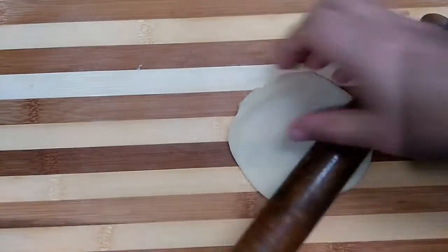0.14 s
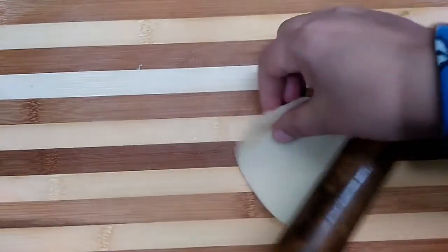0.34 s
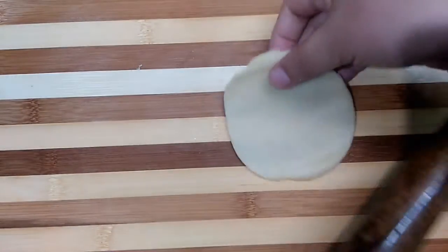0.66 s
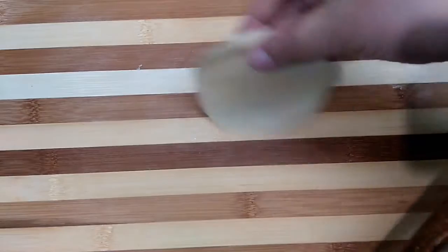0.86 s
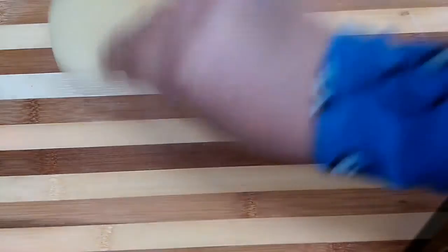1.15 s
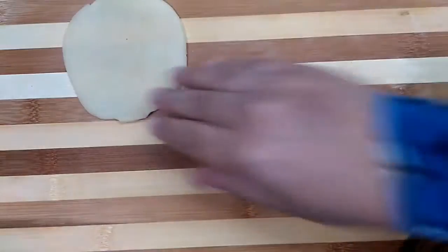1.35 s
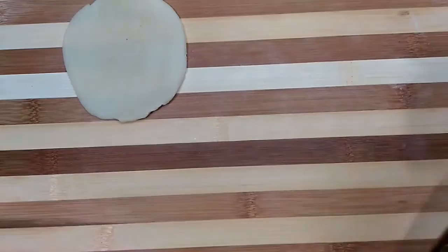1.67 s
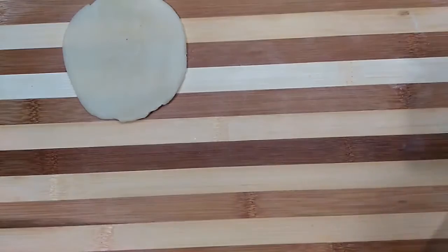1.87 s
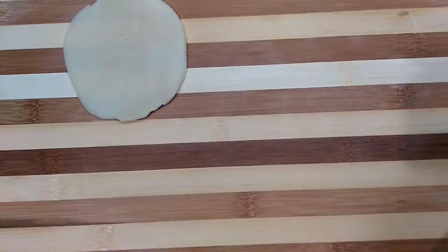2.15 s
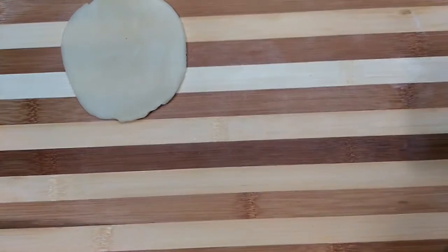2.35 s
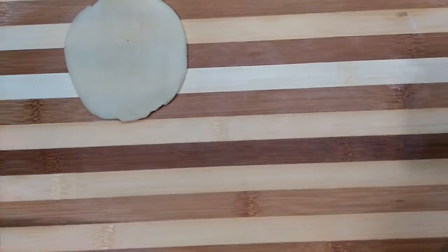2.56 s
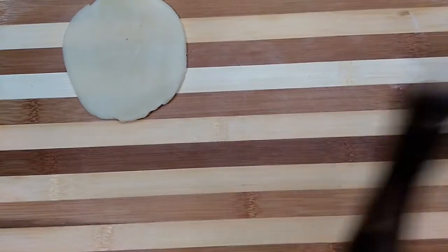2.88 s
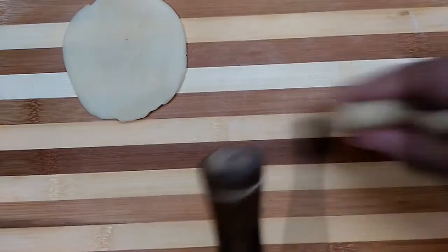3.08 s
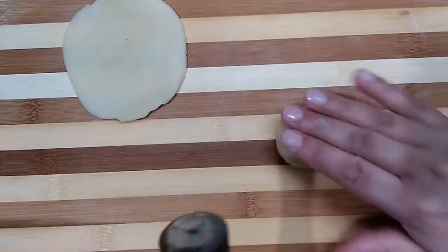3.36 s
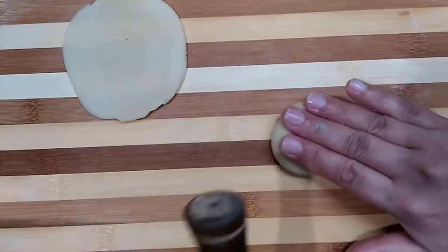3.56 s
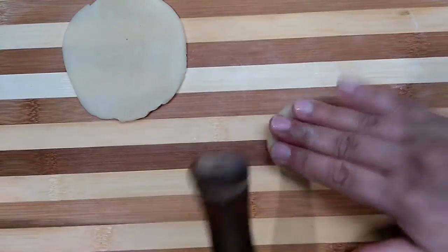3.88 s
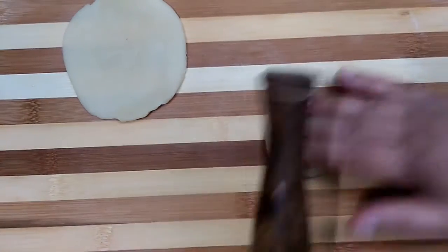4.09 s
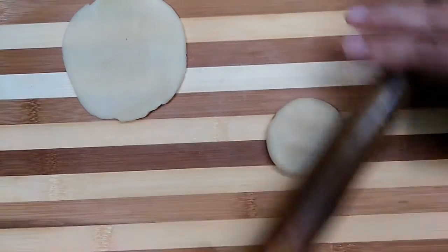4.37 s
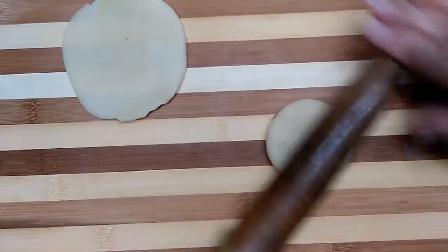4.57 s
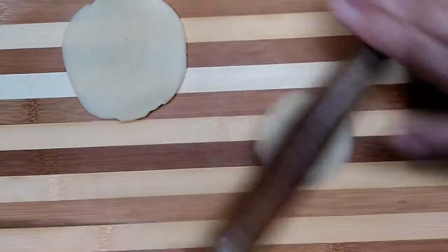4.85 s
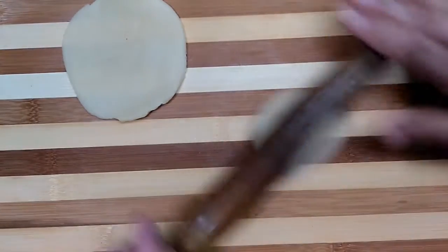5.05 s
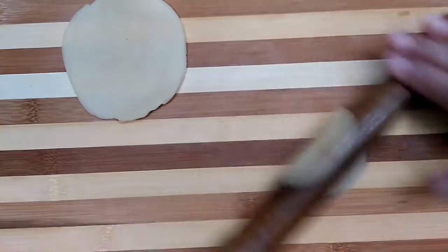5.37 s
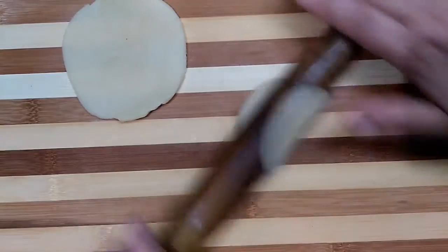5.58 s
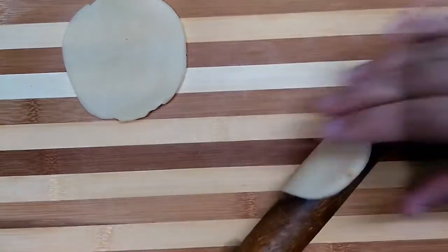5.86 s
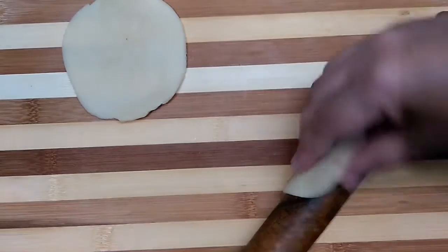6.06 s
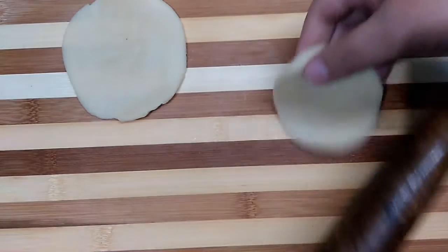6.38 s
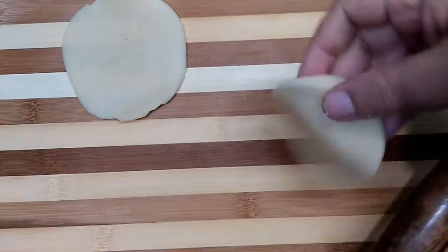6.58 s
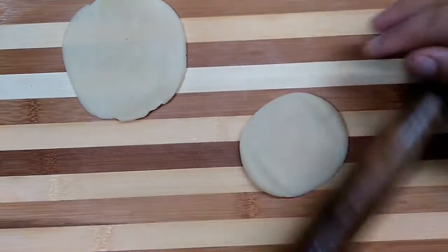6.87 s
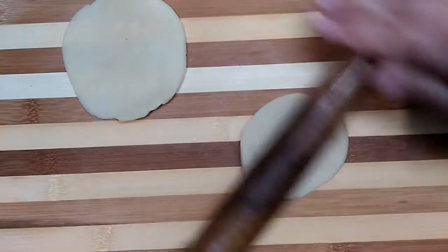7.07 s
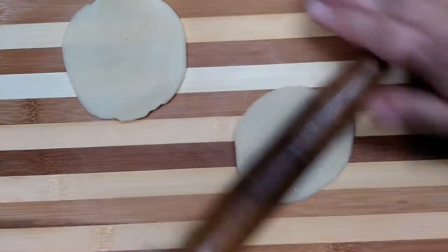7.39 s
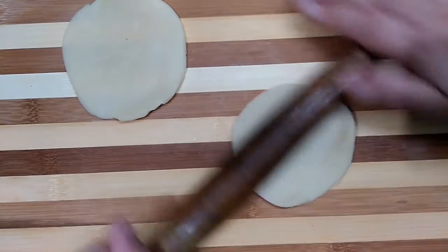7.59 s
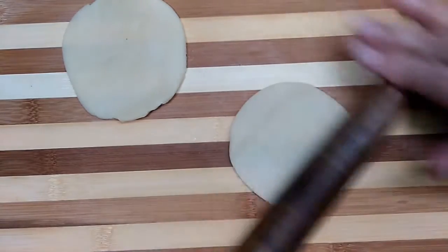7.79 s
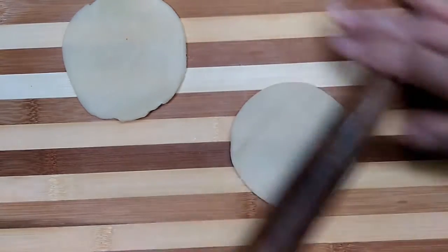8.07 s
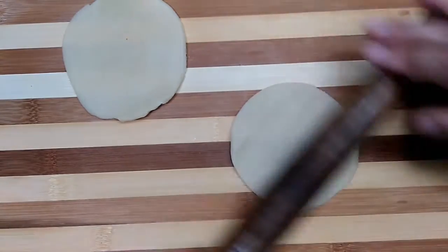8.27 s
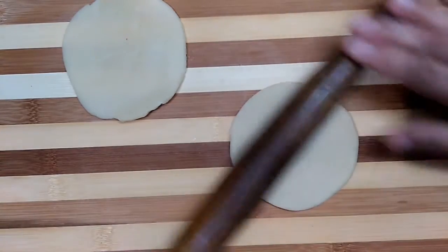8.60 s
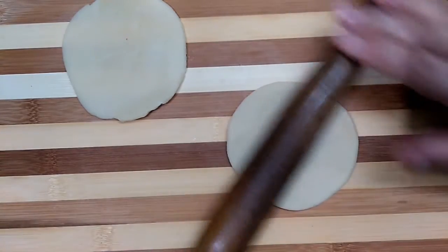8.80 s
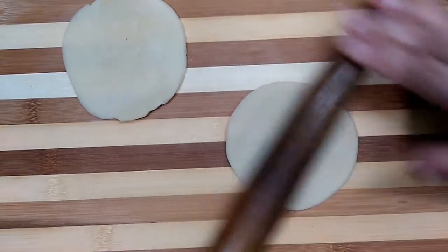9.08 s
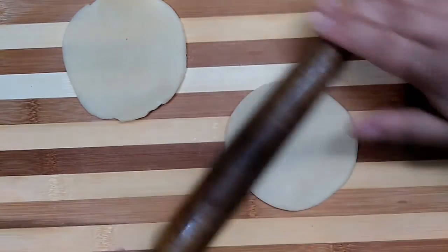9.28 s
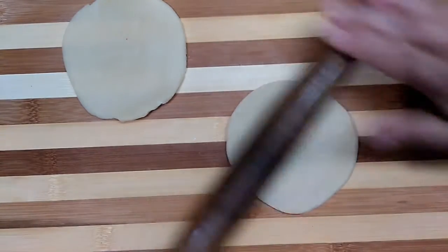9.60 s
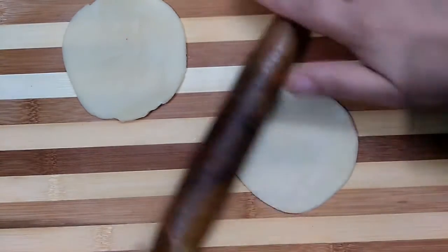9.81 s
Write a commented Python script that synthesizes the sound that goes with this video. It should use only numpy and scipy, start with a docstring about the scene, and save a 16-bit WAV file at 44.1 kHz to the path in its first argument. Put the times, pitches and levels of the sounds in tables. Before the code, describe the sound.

In a quiet humming kitchen, dough is slapped onto wood and rolled in rhythmic swishes with sharp knocks and dull table booms.

```python
"""A quiet kitchen: hands roll small dough rounds with a wooden pin on a bamboo board.
Strokes are shaped noise, a flour hiss over board rumble; cloth rustles and a palm squeaks in narrower noise bands.
Wooden knocks and worktop booms are sums of dying modes; dough slaps are short noise bursts.
Motor and mains hum beat about twice a second under noisy room air.
The left microphone faces the board and hears the blows brighter."""
import sys
import numpy as np
from scipy import signal
from scipy.fft import rfft, irfft, next_fast_len
from scipy.io import wavfile

SR = 44100
rng = np.random.default_rng(int(sys.argv[2]) if len(sys.argv) > 2 else 0)


def master(y):
    """Save y as 16-bit WAV."""
    cut = np.clip(np.atleast_2d(y).T, -1, 1)
    pcm = np.round(cut * 32767)  # scale
    wavfile.write(sys.argv[1], SR, pcm.astype(np.int16))


N = 438337
TIME = np.arange(N) / SR

# modes of pin and board: pitch_hz [Hz], level_db [dB], t60_s [s]
WOOD_MODES = [(334, -6, 0.023), (395, 1, 0.031), (497, -0.5, 0.027), (600, 0, 0.03), (702, 0.5, .022),
              (814, 1.5, 0.021), (930, 3.5, 0.017), (1069, 1, 0.024), (1152, 2.5, 0.03),
              (1352, -0.5, 0.029), (1715, -9, 0.038), (1865, -12, 0.036)]


def amp(db):
    """Turn dB into gain."""
    return 10 ** (np.asarray(db) / 20)


def rms_one(x):
    """Scale to rms 1."""
    return x / np.sqrt(np.mean(x ** 2) + 1e-20)


def at_hz(points, hz):
    """Read a table of (Hz, value) on a log-frequency axis."""
    table_hz, values = np.array(points)[:, 0], np.array(points)[:, 1]
    return np.interp(np.log(hz + 1), np.log(table_hz), values)


def colour(x, spectrum):
    """Filter noise to a spectrum in dB per Hz, at rms 1."""
    size = next_fast_len(N)
    hz = np.arange(size // 2 + 1) * SR / size
    shaped = rfft(x, size) * amp(at_hz(spectrum, hz))
    return rms_one(irfft(shaped, size)[..., :N])


def resonate(x, hz, width_hz):
    """Pass sound through a two-pole resonance whose gain is 1 at its top."""
    r = np.exp(-np.pi * width_hz / SR)
    feed = (1 - r * r) / 2 * np.array([1, 0, -1])
    feedback = [1, -2 * r * np.cos(2 * np.pi * hz / SR), r * r]
    return signal.lfilter(feed, feedback, x)


def ring(modes, t, extra_db):
    """Sum the dying sines of struck modes, each with its own extra level."""
    hz, level_db, t60_s = np.transpose(modes)[:, :, None]
    decay_db = level_db + np.reshape(extra_db, (-1, 1)) - 60 * t / t60_s
    return np.sum(amp(decay_db) * np.sin(2 * np.pi * hz * t), axis=0)


def grains(per_s, spread_db, smooth):
    """Scatter random clicks of uneven size over a share of smooth noise, independent in each channel."""
    sizes = amp(spread_db * np.minimum(rng.exponential(1, (2, N)), 5))
    clicks = sizes * rng.choice([-1, 1], (2, N)) * (rng.random((2, N)) < per_s / SR)
    return rms_one(clicks) + smooth * rng.standard_normal((2, N))


def drift(per_s):
    """Wander slowly at random, with rms 1: low-passed noise after a second of settling."""
    lowpass = signal.butter(2, per_s, fs=SR, output="sos")
    return rms_one(signal.sosfilt(lowpass, rng.standard_normal(N + SR))[SR:])


def swells(rows):
    """Shape the gain of gestures: each a rounded rise, an optional hold and a rounded fall."""
    power = 2.0   # above 1 the swells are more pointed
    out = np.zeros(N)
    for top_s, level_db, rise_s, fall_s, *hold in rows:
        hold_s = sum(hold)
        near = slice(max(int((top_s - rise_s) * SR), 0), int((top_s + hold_s + fall_s) * SR))
        t = TIME[near] - top_s
        rise, fall = 1 + t / rise_s, 1 - (t - hold_s) / fall_s
        open_share = np.clip(np.minimum(rise, fall), 0, 1)
        out[near] += amp(level_db) * np.sin(np.pi / 2 * open_share) ** power
    return out


def add(out, sound, start_s):
    """Mix a sound in at its start time."""
    at = round(start_s * SR)
    out[..., at:at + sound.shape[-1]] += sound[..., :N - at]


def strokes():
    """The pin crushes flour, turns in the hands (each grip hollow waxes and wanes) and drives the board."""
    # pin strokes swelling with pin speed: fastest_s [s], level_db [dB], rise_s [s], fall_s [s]
    stroke_rows = [(.038, -55, 0.067, 0.14), (4.61, -55.5, 0.096, 0.11), (4.71, -52, 0.084, 0.075),
                   (4.79, -53, 0.039, 0.28), (5.028, -50, 0.084, 0.092), (5.204, -53, 0.18, 0.15),
                   (5.404, -49.5, 0.14, 0.1), (5.6, -50, 0.19, 0.085), (5.8, -49.5, 0.2, 0.12),
                   (7.052, -53, 0.041, 0.066), (7.15, -52, 0.069, 0.11), (7.33, -45.5, 0.097, 0.048),
                   (7.456, -49.5, 0.12, .09), (7.608, -51.5, 0.11, 0.13), (7.79, -47, 0.098, 0.14),
                   (7.966, -50, 0.092, 0.1), (8.12, -49, 0.099, 0.19), (8.52, -50.5, 0.13, 0.06),
                   (8.66, -51, 0.12, 0.094), (8.81, -49.5, 0.064, 0.11), (8.97, -51.5, 0.093, 0.13),
                   (9.15, -48.5, 0.092, 0.14), (9.32, -49.5, 0.092, 0.12), (9.5, -48, 0.09, 0.13),
                   (9.7, -47.5, 0.14, .18), (9.94, -56, 0.13, 0.057)]
    # flour hiss spectrum: pitch_hz [Hz], level_db [dB per Hz]
    flour_spectrum = [(600, -24), (1500, -1.5), (3000, -24), (5000, -1), (7000, 4), (9000, -0.5),
                      (12000, -1.5), (16000, 1.5)]
    # hollows of the left hand round the handle: pitch_hz [Hz], width_hz [Hz], level_db [dB]
    grip_hollows = [(1875, 180, -13.5), (2990, 1500, -3.5), (3195, 250, -7.5), (4740, 480, -6),
                    (5244, 360, -1.5), (5850, 300, -6.5), (6570, 900, 1), (7110, 620, -5.5),
                    (8340, 4400, -3.5)]
    # board resonances under the pin: pitch_hz [Hz], width_hz [Hz], level_db [dB]
    rolling_modes = [(61, 47, -34), (790, 77, 8), (960, 84, 10.5), (1340, 48, -3), (1830, 87, -12.5)]
    rumble_db = -12   # middle level of the board rumble, before left-right balance

    grip = 0
    for hz, width_hz, level_db in grip_hollows:
        rub = grains(9000.0, 4.5, 4.0)[0]
        rub = resonate(resonate(rub, hz, width_hz), hz, width_hz)
        grip = grip + rms_one(rub) * amp(level_db + 3.5 * drift(11.0))
    flour = colour(grains(8300.0, 4.0, 9.4), flour_spectrum)
    hiss = flour * amp([[-8], [-9]]) + rms_one(grip) * amp([[3], [-18]])

    drive = grains(2500.0, 4.0, .8)
    drive = 0.43 * drive[0] + 1.13 * drive   # partly alike on both sides
    rumble = rms_one(sum(amp(level_db) * resonate(drive, hz, width_hz)
                         for hz, width_hz, level_db in rolling_modes))
    rumble = rumble * amp(rumble_db + 2.0 * drift(5.5)) * amp([[-2.5], [2.5]])
    return swells(stroke_rows) * (hiss + rumble)


def rustle():
    """Palms and sleeves rub: skin and cloth give a fine bright hiss."""
    # rubs: top_s [s], level_db [dB], rise_s [s], fall_s [s], hold_s [s]
    rub_rows = [(.27, -61, 0.09, 0.038, 0.078), (.65, -63, 0.058, 0.099, 0.032),
                (.96, -64, .09, 0.082, 0.045), (1.25, -62.5, 0.28, 0.13, 0), (1.31, -58, 0.033, 0.11, 0),
                (1.42, -60.5, 0.12, 0.15, 0.69), (2.55, -75, .03, 0.12, 0), (2.82, -72.5, .02, .18, 0),
                (3.022, -65.5, 0.014, 0.23, 0.36), (3.766, -71, 0.087, 0.074, 0),
                (3.874, -64, 0.019, 0.11, 0), (4.282, -66.5, 0.35, 0.14, 0), (4.422, -65, .01, .15, 0.098),
                (6.036, -66.5, 0.14, 0.097, 0.086), (6.176, -63.5, 0.027, 0.28, 0.077),
                (6.536, -68.5, 0.15, .05, 0), (6.8, -61.5, 0.013, 0.044, 0.059),
                (6.942, -61, 0.074, .07, 0.026)]
    # cloth hiss spectrum: pitch_hz [Hz], level_db [dB per Hz]
    cloth_spectrum = [(4500, -13), (5500, -6), (6500, -2), (8000, -4), (10000, -12), (15500, -16.5)]
    hiss = colour(grains(9000.0, 1.9, 3.1), cloth_spectrum)
    return swells(rub_rows) * hiss * amp([[5], [-1.5]])


def squeaks():
    """A palm slips on the wooden handle: noise in one narrow resonance, mostly on the left."""
    # squeaks: start_s [s], level_db [dB], length_s [s]
    squeak_rows = [(3.368, -60, 0.045), (5.96, -69, 0.21), (6.176, -63, 0.035), (7.024, -52.5, 0.049),
                   (8.07, -54, 0.14)]
    pitch_hz, width_hz = 5080, 400
    rub = resonate(resonate(rng.standard_normal(N), pitch_hz, width_hz), pitch_hz, width_hz)
    swell = 0
    for start_s, level_db, length_s in squeak_rows:
        progress = np.clip((TIME - start_s) / length_s, 0, 1)
        swell = swell + amp(level_db) * np.sin(np.pi * progress)
    return rms_one(rub) * swell * amp([[5], [-10]])


def knocks():
    """Each blow favours the wood modes near its own pitch; a longer contact dulls it."""
    # knocks: start_s [s], level_db [peak dB of the wood], pitch_hz [Hz, favoured], contact_ms [ms],
    # fall_db [dB per octave away from that pitch], low_db [dB, relative low body], pan_db [dB, left minus right]
    knock_rows = [(0.219, -18, 443, 0.16, 10.5, -13, 1.5), (0.241, -23.5, 1050, 0.18, 2.5, -14, -13),
                  (0.361, -39.5, 700, 0.3, 26, -25, -9), (0.539, -50, 900, 0.3, 6, -12, -18),
                  (0.568, -45, 596, 0.25, 28, -4, -4), (1.257, -35, 564, 0.2, 7, -17, 3),
                  (1.284, -34, 350, 0.11, -5, -24, 11), (1.291, -22.5, 1370, 0.17, 16.5, -27, -6),
                  (1.302, -24, 1090, 0.42, 15, -37, -2), (2.363, -30, 580, 0.48, 20, 1.5, -7.5),
                  (3.341, -36.5, 623, 0.22, 26, -3.5, -6), (4.018, -42, 595, 0.62, 16, 1.5, -6),
                  (4.723, -13, 625, 0.31, 8, -11, -2.5), (4.745, -55, 401, 0.9, 17, 11, 6),
                  (4.778, -35, 1100, 0.2, 13, -7, -7), (5.214, -34.5, 804, 0.34, 40, -17, -4),
                  (5.405, -44, 760, 0.65, 34, 1, -10), (5.598, -32, 857, 0.18, 43, -21, -4),
                  (5.714, -32.5, 724, 0.2, 64, -16, -2), (6.263, -17.5, 390, 0.36, 4.5, -14.5, -3),
                  (6.751, -20, 650, 0.62, 17, -20, -1), (8.18, -11.5, 1070, 0.68, 4.5, -14.5, -2),
                  (8.417, -28, 374, 0.15, 5.5, 7.5, 0.5)]
    # low body of the board: pitch_hz [Hz], level_db [dB], t60_s [s]
    low_modes = [(135, 5.5, 0.068), (194, -1.5, 0.1), (225, 6, 0.042)]
    out, t = np.zeros((2, N)), TIME[:SR // 4]
    mode_hz = np.array(WOOD_MODES)[:, 0]
    chance = rng.standard_normal((len(knock_rows), len(WOOD_MODES)))
    for (start_s, level_db, hz, contact_ms, fall_db, low_db, pan_db), luck in zip(knock_rows, chance):
        octaves_off = np.abs(np.log2(mode_hz / hz))
        body = ring(WOOD_MODES, t, -fall_db * octaves_off + 2.5 * luck)
        body *= 1 - np.exp(-t / .0007)   # the parts settle onto each other
        force = t * np.exp(-(1000 * t / contact_ms) ** 2 * 4)
        body = signal.fftconvolve(body, force[:300])[:len(t)]
        low = ring(low_modes, t, 0) * (1 - np.exp(-t / 0.0048))
        blow = body / np.abs(body).max() + amp(low_db - 6.5) * low
        sides_db = level_db + np.array([[pan_db], [-pan_db]]) / 2
        add(out, blow * amp(sides_db), start_s + 0.00152)
    return out


def slaps():
    """Soft dough does not ring: a burst of noise, tilted dull or bright, partly alike on both sides."""
    # dough and fingers slapping or scuffing the board:
    # start_s [s], level_db [dB], tilt_db [dB per octave], rise_ms [ms], decay_ms [ms]
    slap_rows = [(.241, -49, 8, 0.34, 22), (0.361, -49, -6, 1.1, 6), (0.624, -55, 0.5, 0.93, 10),
                 (.65, -54.5, -3.5, 6.5, 8.1), (1.294, -32, 1.5, 0.2, 2.3), (1.303, -25.5, 1, 0.45, 2),
                 (1.3057, -24.5, 3, 1.1, 3.15), (2.362, -48, 5.5, .5, 16), (2.385, -59, 6.5, 16, 64),
                 (2.439, -57, 9, 16, 38), (3.362, -55.5, 5.5, 17, 19), (3.874, -58, 17, 1.2, 5.8),
                 (4.419, -57, 15.5, .5, 13), (4.769, -43.5, 1, 2.8, 10), (6.027, -53, 12.5, 0.58, 2.3),
                 (6.238, -59.5, -2.5, 12, 20), (6.7492, -23.5, 2, 0.42, 1.3), (6.753, -20, -2.5, 0.56, 4.6),
                 (6.7589, -25, 7, 0.16, 2), (7.312, -51, 8.5, 14, 12)]
    # slap spectrum before tilt: pitch_hz [Hz], level_db [dB per Hz]
    smack_spectrum = [(250, -35), (600, 9.5), (1200, 4), (2000, -1), (3100, -4.5), (4200, -14),
                      (5200, -12.5), (8000, -20), (15000, -42)]
    out, t = np.zeros((2, N)), TIME[:SR // 4]
    hz = np.arange(len(t) // 2 + 1) * SR / len(t)
    for start_s, level_db, tilt_db, rise_ms, decay_ms in slap_rows:
        noise = rng.standard_normal((2, len(t)))
        noise = noise + 0.13 * noise[0]
        shape = amp(at_hz(smack_spectrum, hz) + tilt_db * np.log2((hz + 1) / 1000))
        noise = rms_one(irfft(rfft(noise) * shape, len(t)))
        burst = (1 - np.exp(-1000 * t / rise_ms)) ** 2 * np.exp(-1000 * t / decay_ms)
        add(out, amp(level_db) * noise * burst / burst.max(), start_s)
    return signal.sosfilt(signal.butter(2, 400, "high", fs=SR, output="sos"), out)


def drag():
    """The pin is dragged aside on bare wood: uneven catches rattle the middle modes under a bright hiss."""
    # the drag: top_s [s], level_db [dB], rise_s [s], fall_s [s], hold_s [s]
    drag_row = (.362, -66, .003, .012, .075)
    rattle_db = 14.5   # relative to the hiss
    favoured_db = -9.0 * np.abs(np.log2(np.array(WOOD_MODES)[:, 0] / 800.0))
    wood = ring(WOOD_MODES, TIME[:SR // 20], favoured_db)
    rattle = signal.fftconvolve(grains(920.0, 2.3, 0.38), wood[None], axes=1)[:, :N]
    hiss = resonate(rng.standard_normal(N), hz=5200, width_hz=1300) * amp([[3], [-8]])
    return swells([drag_row]) * (rms_one(hiss) + amp(rattle_db) * rms_one(rattle))


def pushes():
    """A soft weight sets the worktop booming; the boom swells over a cycle or two."""
    # pushes: time_s [s], level_db [dB], upper_db [dB, upper modes relative to the lower]
    push_rows = [(0.265, -40.5, 0), (1.318, -30.5, -4), (2.377, -49.5, -5), (3.356, -37, -8),
                 (4.037, -35, -0.5), (4.607, -24, -12.5), (4.741, -39.5, 12.5), (5.025, -40, -5),
                 (5.598, -48.5, 6), (6.282, -44.5, 9), (6.481, -52, 9), (6.789, -41.5, 9),
                 (7.089, -20, -12.5), (8.199, -34.5, 8.5), (8.434, -21.5, 2.5), (9.484, -46.5, -7),
                 (9.689, -49.5, -3)]
    # lower worktop modes: pitch_hz [Hz], level_db [dB], t60_s [s]
    lower_modes = [(68.6, 4, 0.85), (62.6, -37, 0.1), (81, -26, 0.048)]
    # upper worktop modes: pitch_hz [Hz], level_db [dB], t60_s [s]
    upper_modes = [(100.1, 1.5, 0.27), (127.4, 3.5, 0.23), (179, -8.5, 0.25)]
    out, t = np.zeros((2, N)), TIME[:SR]
    lower = ring(lower_modes, t, 0) * amp([[-1.1], [1.1]])
    upper = ring(upper_modes, t, 0) * amp([[-4], [2.5]])
    onset = (1 - np.exp(-t / 0.0089)) ** 2
    for time_s, level_db, upper_db in push_rows:
        boom = lower + amp(upper_db) * upper
        add(out, amp(level_db) * boom * onset, time_s - .022)   # begins ahead of its table time
    return signal.sosfilt(signal.butter(2, 42, "high", fs=SR, output="sos"), out)


def kitchen(x):
    """Reverberation: octave bands of noise that die faster in the treble, independent in each channel."""
    # decay of the room: pitch_hz [Hz], t60_s [s]
    room_decay = [(150, 0.62), (500, 0.29), (1500, 0.28), (4000, 0.23), (10000, 0.1)]
    reverb_db = -7
    t, tail = TIME[:SR // 2], 0
    for low_hz in 60 * 2. ** np.arange(8):
        band = signal.butter(2, [low_hz, 2 * low_hz], "band", fs=SR, output="sos")
        noise = signal.sosfilt(band, rng.standard_normal((2, len(t))))
        tail = tail + noise * amp(-60 * t / at_hz(room_decay, np.sqrt(2) * low_hz))
    tail = tail * (1 - np.exp(-t / 0.0021))
    tail = tail / np.sqrt(np.sum(tail ** 2) / 2)
    return amp(reverb_db) * signal.fftconvolve(x, tail, axes=1)[:, :N]


def left_bright(x):
    """The left microphone faces the board: a broad resonance lifts its lower treble."""
    lift = amp(2.5) * resonate(x[0], hz=3280, width_hz=7600)
    return np.array([x[0] + lift, x[1]])


def hum():
    """Motor and mains tones beat and waver over a narrow room drone, with faint tones of fixed pitch."""
    # faint tones: pitch_hz [Hz], level_db [dB rms, before the room swell]
    faint_tones = [(488.25, -77), (14998, -88)]
    motor_hz, motor_db = 97.62, -54
    mains_hz, mains_db = 99.83, -57
    in_step_s, waver_db = .2, 0.5   # moment when the two agree; rms waver of each
    low = 0
    for hz, level_db in [(motor_hz, motor_db), (mains_hz, mains_db)]:
        tone = np.sqrt(2) * np.cos(2 * np.pi * hz * (TIME - in_step_s))
        low = low + amp(level_db + waver_db * drift(0.65)) * tone
    # a room resonance fed by rumble
    drone = resonate(rng.standard_normal(N), hz=98.7, width_hz=2.2)
    low = low + amp(-69) * rms_one(drone)
    lines = sum(np.sqrt(2) * amp(level_db) * np.sin(2 * np.pi * hz * TIME)
                for hz, level_db in faint_tones)
    return low * amp([[-.8], [.8]]) + lines


def air():
    """Room tone and microphone hiss: mid and side noise mixed to be more alike in the bass than the treble."""
    # room tone spectrum: pitch_hz [Hz], level_db [dB per Hz]
    air_spectrum = [(15, -56), (25, -19), (43, -11), (72, -5), (97, -16), (120, -7), (145, -14), (249, -21),
                    (439, -25.5), (503, -21.5), (1370, -35.5), (3430, -35.5), (4740, -38.5), (8360, -34.5),
                    (16000, -43)]
    # likeness of the sides: pitch_hz [Hz], correlation [-1 to 1]
    likeness = [(60, 0.41), (240, 0.31), (950, 0.086), (3770, -0.13), (15000, 0.00028)]
    # balance of the sides: pitch_hz [Hz], level_db [dB, left minus right]
    balance = [(60, -1), (180, -5.5), (550, -4), (1650, -4), (4970, 0.5), (15000, -1.5)]
    air_db = -59   # rms of the part above 110 Hz, before the room swell
    size = next_fast_len(N)
    hz = np.arange(size // 2 + 1) * SR / size
    mid, side = rfft(rng.standard_normal((2, size))) * amp(at_hz(air_spectrum, hz))
    alike = np.clip(at_hz(likeness, hz), -1, 1)
    pair = np.sqrt(1 + alike) * mid + np.sqrt(1 - alike) * side * [[1], [-1]]
    pair = pair * amp(at_hz(balance, hz) / [[2], [-2]])
    level = np.sqrt(np.mean(irfft(pair * (hz > 110), size) ** 2))
    return amp(air_db) * irfft(pair, size)[:, :N] / level


def scene():
    """Mix everything on the board, its room and the quiet around it."""
    # room tone and hum rise and sink: time_s [s], level_db [dB]
    room_swell = [(0, 2.5), (1, -0.5), (2.2, -2.5), (2.6, -1.5), (4, 1.5), (5.5, 2), (6.7, -1), (7.2, 2.5),
                  (8.5, 3), (9.94, 0.5)]
    blows = knocks() + slaps() + drag()
    blows = left_bright(blows + kitchen(blows))
    quiet = (air() + hum()) * amp(np.interp(TIME, *np.transpose(room_swell)))
    return strokes() + rustle() + squeaks() + blows + pushes() + quiet


def record(dry):
    """Cut the top steeply with a low-pass whose stopband begins at 15800 Hz."""
    lowpass = signal.cheby2(16, 70, 15800, fs=SR, output="sos")
    return signal.sosfilt(lowpass, dry)


dry = scene()
out = record(dry)
master(out)
```